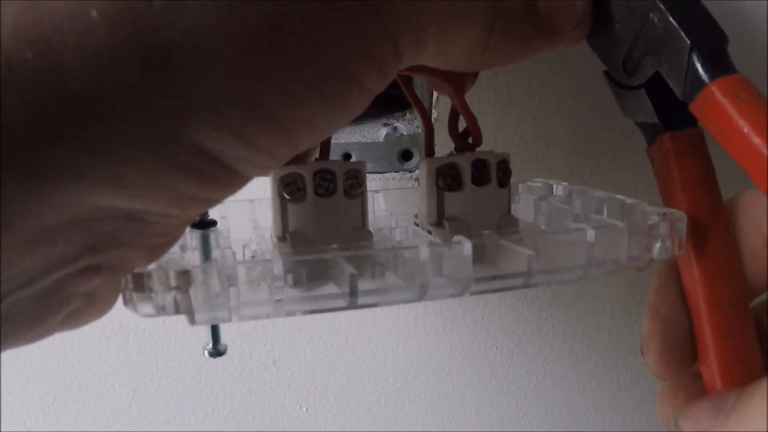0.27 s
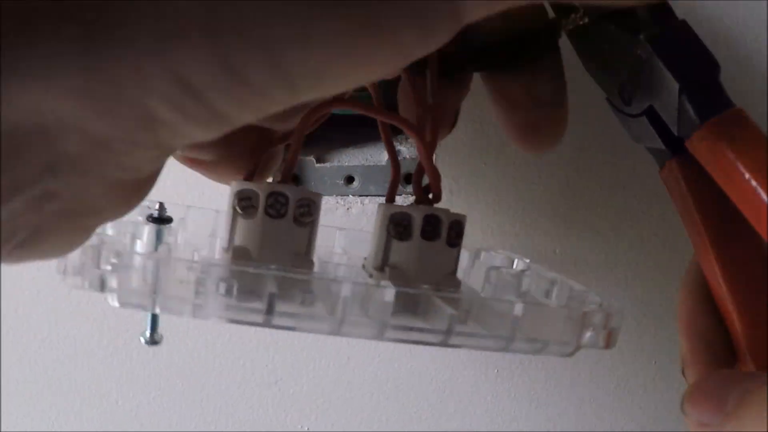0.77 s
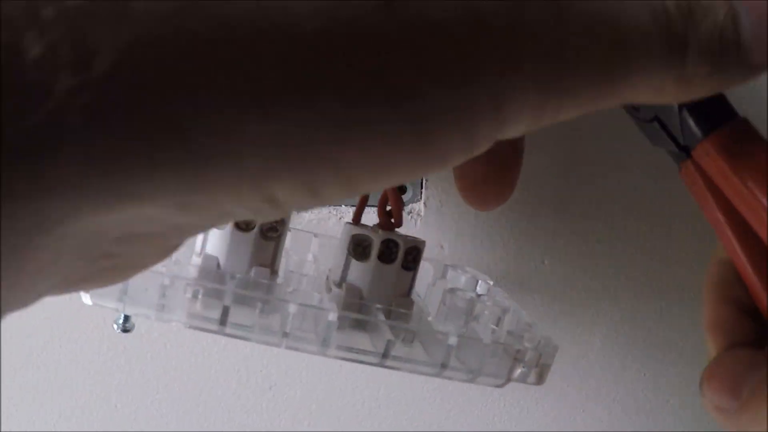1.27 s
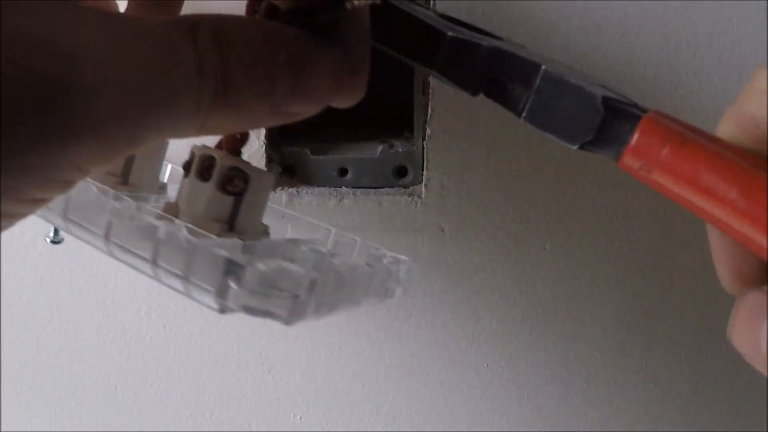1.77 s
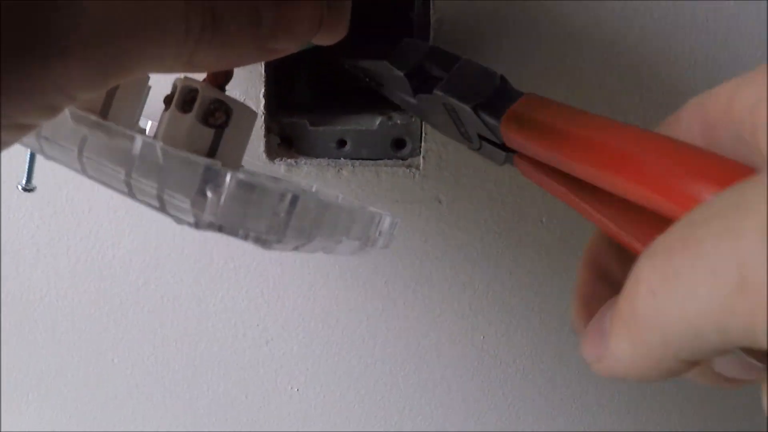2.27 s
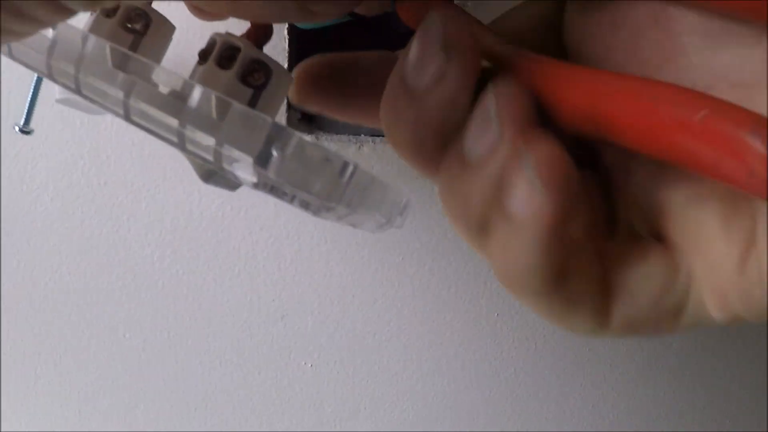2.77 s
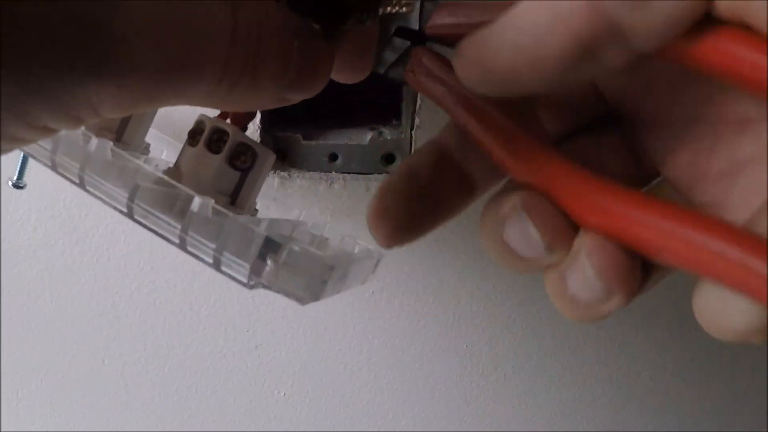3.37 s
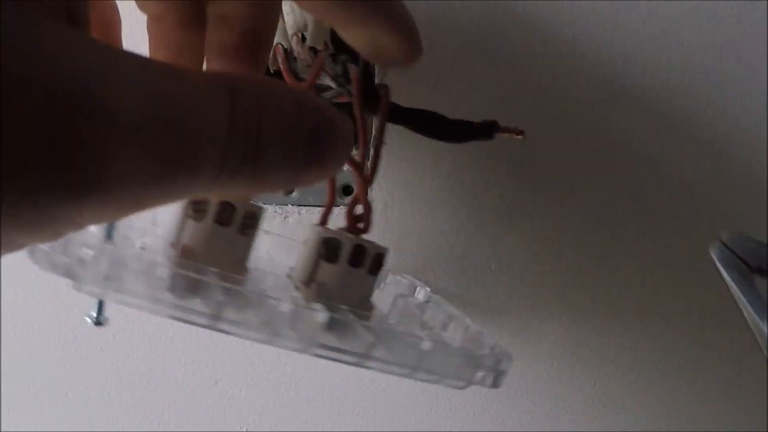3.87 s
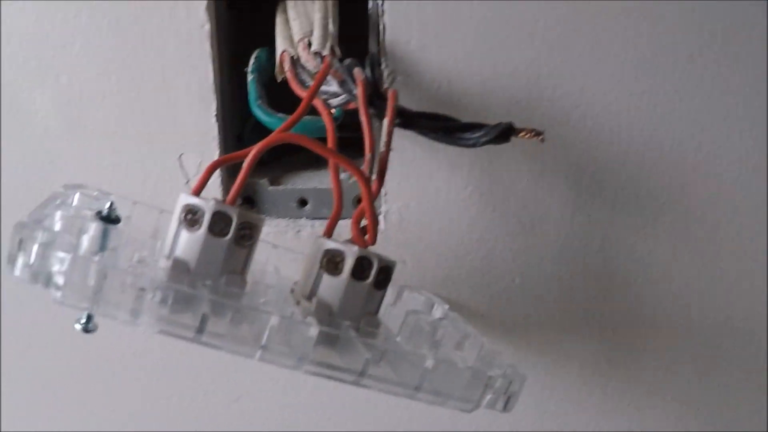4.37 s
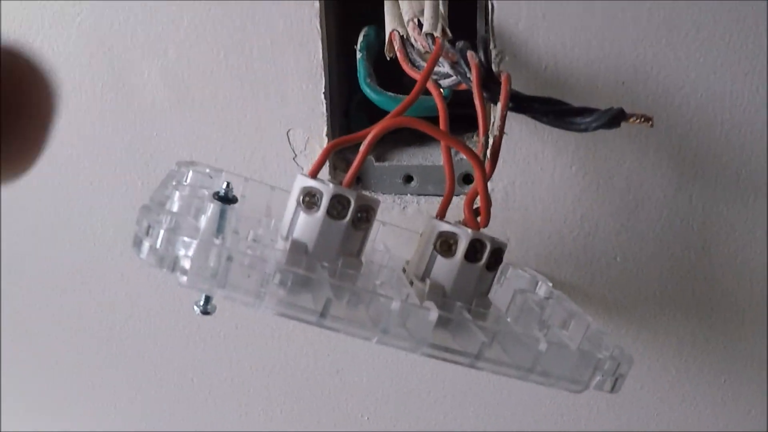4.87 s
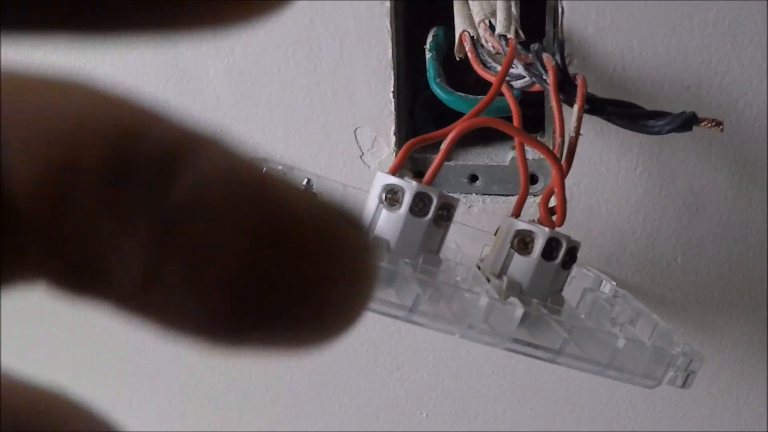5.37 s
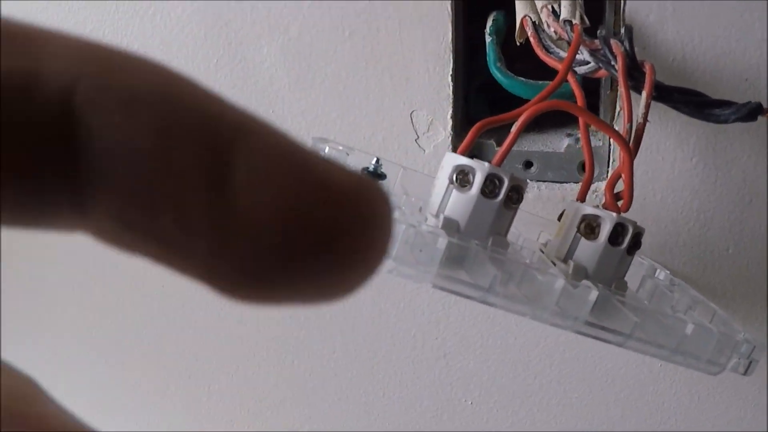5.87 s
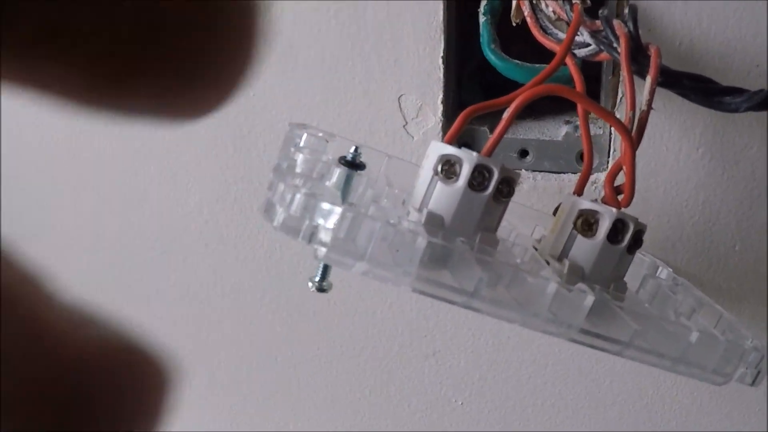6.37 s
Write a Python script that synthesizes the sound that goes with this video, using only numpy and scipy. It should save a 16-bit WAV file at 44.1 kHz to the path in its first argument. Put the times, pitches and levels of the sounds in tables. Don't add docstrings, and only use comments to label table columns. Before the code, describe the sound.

Bright metallic clicks and small scrapes from pliers on copper wire, followed by low handling bumps and two hard, overloading knocks close up.

```python
import sys
import numpy as np
from scipy import signal
from scipy.fft import rfft, irfft
from scipy.io import wavfile

SR = 44100
rng = np.random.default_rng(int(sys.argv[2]) if len(sys.argv) > 2 else 0)


def store_pcm(level_fs):
    pcm = np.round(np.clip(level_fs, -1, 1) * 32767).astype(np.int16)
    wavfile.write(sys.argv[1], SR, np.atleast_2d(pcm).T)


def volts(x):
    e = np.asarray(x, float) / 20
    return 10 ** e


N = 292824
T = np.arange(N) / SR

# (f/Hz, level/dB, t60/s)
JAW_MODES = [(1516, -0.5, 0.014), (1681, 9.5, 0.0064), (2343, 1, 0.012), (2950, -2, 0.0018),
             (3710, 4, 0.017), (4000, 9, 0.0025), (4780, -4, 0.0031), (5370, 9.5, 0.0039),
             (5900, -1.5, 0.037), (6130, 7.5, 0.011), (7060, 3, 0.014), (9110, -6.5, 0.0099),
             (10043, -29, 0.016), (12500, -22, .003)]
# (t/s, peak level/dB, ring f/Hz, dull part level/dB, slip/ms)
BITES = [(0.9068, -25.5, 4820, -22.5, 3.2), (1.0524, -31, 4660, -28, 3), (1.0724, -11.5, 4430, -17, 1.7),
         (1.078, -3, 4160, -19.5, 0.8), (1.0783, -24, 9700, -34.5, 2.5), (1.0781, -8.5, 5960, -33.5, 3.9),
         (1.083, -22.5, 5970, -8, 2.5), (2.6384, -6.5, 3290, 1, 1.1), (2.644, -19, 2950, 2, 12),
         (2.65, -10.5, 2950, -5, 1.7), (2.6507, -16.5, 6100, -29, 2.4), (2.6405, -17, 5640, -25, 3),
         (2.6574, -19.5, 2901, -11, 1.5), (2.7586, -31, 3420, -6, 3.9), (3.2086, -31.5, 4280, -15.5, 3),
         (3.2609, -21, 3830, -8, 1.7), (3.2614, -25, 6500, -20, 3), (3.3901, -13, 5410, -16, 3.3),
         (3.391, -20, 4600, -12.5, 2), (3.3915, -7.5, 3610, -19, 1.9), (3.3958, -23, 5240, -5, 2.3),
         (3.397, -19, 5300, -10, 3.6), (3.3994, -13, 5470, -14, 1.5), (3.3992, -31.5, 8840, -29.5, 1.3),
         (3.4018, -28, 5270, -31, 3), (3.645, -29.5, 3192, 7.5, 3.4), (3.7274, -19, 3140, -29, 4.6),
         (3.7267, -17.5, 5740, -26.5, 4), (3.7284, -17.5, 3300, -29, 2.8), (3.7295, -9, 3180, -21.5, 2),
         (3.7323, -15.5, 3070, -31, 1.9), (3.7358, -21.5, 7160, -32, 4.1), (3.7368, -13, 5760, -23.5, 0.8),
         (3.742, -28, 5500, -28.5, 8.8), (3.8172, -34.5, 4381, -13, 8.5), (4.001, -31, 4130, -10, 6.1),
         (4.0234, -26.5, 4445, -4, 2.7)]
# (t/s, peak level/dB, ring f/Hz, dull part level/dB)
TICKS = [(0.7176, -41, 3240, -10), (0.718, -45, 1540, -28), (1.37, -39, 2240, -20), (2.381, -34, 1360, -26),
         (0.8598, -46, 6544, -1), (3.4125, -36, 5300, -20), (.918, -38.5, 3034, 0), (.946, -45, 4000, 2),
         (1.13, -47, 4000, 2), (2.249, -51, 2900, 14), (0.98, -39, 3700, 1), (1.112, -31, 6000, -20),
         (1.119, -36, 5760, -26), (1.2385, -32.5, 4640, -12), (1.261, -38.5, 3770, -11),
         (1.369, -37.5, 3040, -13), (1.795, -53, 6450, -6), (1.832, -42.5, 6250, -8),
         (1.911, -41.5, 6000, -19), (2.386, -35, 4450, 3), (2.6027, -38.5, 3730, 5),
         (2.704, -38, 3050, -11), (2.9732, -35.5, 3680, -8), (3.0111, -41, 7570, -3),
         (3.0218, -43, 4660, 0), (3.0325, -37.5, 3250, 5), (3.05, -40, 3380, -2), (3.144, -41.5, 2911, -8),
         (3.2215, -33.5, 2700, -20), (3.305, -38.5, 6710, 4), (3.4052, -25.5, 5300, -26),
         (3.611, -41, 3108, 11.5), (3.666, -47, 4620, -1.5), (4.0291, -31, 4600, -6),
         (4.175, -36.5, 4600, -4), (4.4744, -37, 2884, -5)]


def jaws():
    tick_slip_ms, build_ms = 7.3, 0.23
    unlike = 0.61
    split_hz = 4450
    spread_db, lag = 3, 5
    out, t = np.zeros((2, N)), np.arange(1800) / SR
    contacts = BITES + [(*tick, tick_slip_ms) for tick in TICKS]
    for s, peak_db, hz, dull_db, slip_ms in contacts:
        second_hz = hz * (1.39 if hz < split_hz else 0.73)
        envelope = np.exp(-t * 1800 / max(slip_ms, .2)) * np.tanh(t * 1000 / build_ms)
        sparse = rng.random((2, len(t))) < .3
        both, apart = rng.standard_normal((2, len(t))) * sparse * envelope
        both[6] = 2.5
        hits = both + unlike * apart * [[1], [-1]]
        late = np.array([np.roll(both, lag), np.roll(both, rng.integers(0, 2 * lag + 1))])
        common, per_port = rng.standard_normal((len(JAW_MODES), 1)), rng.standard_normal((len(JAW_MODES), 2))
        spread = spread_db * (common + .6 * per_port)

        sound = volts(12.0) * bloom(hits, hz, 0.0054) + volts(5.5) * ring(hits, hz, 0.013)
        sound = sound + volts(np.array([[5.0], [2.5]])) * ring(hits, second_hz, 0.0032)
        for (mode_hz, db, t60), uneven_db in zip(JAW_MODES, spread):
            if mode_hz > 2700:
                octaves_off = min(abs(np.log2(mode_hz / hz)), abs(np.log2(mode_hz / second_hz)))
                near_db, mode = -36.0 * octaves_off, ring(hits, mode_hz, t60)
            else:
                near_db, mode = dull_db + 6.5, bloom(late, mode_hz, t60)
            shade_db = (mode_hz > 8000) * np.array([[-4.0], [3.0]])
            sound = sound + volts(db + near_db + shade_db + uneven_db[:, None]) * mode
        sound = band(sound, 1280, max(9300, 2.53 * hz))
        sound = band(sound, 1400, 20000)
        sound[0] = np.roll(sound[0], 1)
        add(out, s, volts(peak_db) * pan(db=0.5) * sound / np.abs(sound.mean(axis=0)).max())
    return out


# (peak t/s, peak level/dB, build-up/s per 20 dB, dying/s per 20 dB, brightest f/Hz)
CREEP = [(.88, -54, 0.074, 0.07, 6430), (.909, -45.5, 0.015, 0.043, 4400), (1.055, -44, 0.011, 0.041, 4300),
         (1.09, -40, .004, 0.02447, 5900), (1.114, -43, 0.029, 0.075, 5720),
         (1.238, -51, 0.011, 0.11, 4670), (1.82, -55, 0.3056, 0.18, 6355), (1.91, -50, 0.0152, 0.068, 4930),
         (2.384, -43.5, 0.0096, 0.00931, 3820), (2.976, -50, 0.00984, 0.034, 4160),
         (3.02, -50.5, 0.088, 0.087, 4600), (3.212, -30.5, 0.00665, 0.027, 4830),
         (3.258, -47.5, 0.011, 0.057, 5000), (3.384, -53, 0.1168, 0.004, 3070),
         (3.644, -52, 0.031, 0.04, 4042), (4.022, -45.5, 0.046, 0.076, 4100),
         (4.18, -58, 0.03775, 0.02903, 3280), (4.224, -57, 0.1688, 0.16, 3000)]


def creep():
    sizes = volts(2 * np.minimum(rng.exponential(1, N), 4))
    grit = sizes * rng.choice([-1, 1], N) * (rng.random(N) < 2500 / SR)
    steel = sum(volts(db) * ring(grit, hz, t60) for hz, db, t60 in JAW_MODES)
    broad = rms_one(band(steel, 2500, 10000))
    out = np.zeros(N)
    for *shape, hz in CREEP:
        out += swells([shape]) * (0.39 * broad + 0.47 * rms_one(ring(grit, hz, 0.0081)))
    return volts(-0.5) * out


# (f/Hz, level/dB)
PORT_LEFT = [(1500, 4), (2300, -1), (3100, -7.5), (4000, 0.5), (5500, 1.5), (7500, 3), (10000, -14.5),
             (14000, -2.5)]
# (f/Hz, level/dB)
PORT_RIGHT = [(1500, -2), (2300, -7), (3100, -1), (4000, 1), (5500, -4.5), (7500, 3.5), (10000, 6.5),
              (14000, 0.5)]


def ports(x):
    hz = np.maximum(np.fft.rfftfreq(N, 1 / SR), 1)
    return irfft(rfft(x) * volts([at_hz(PORT_LEFT, hz), at_hz(PORT_RIGHT, hz)]), N)


def room(x):
    t60_s, level_db = 0.35, -12.5
    t = np.arange(SR // 4) / SR
    scattered = band(np.abs(x) * rng.standard_normal(N), 700, 6500) + .25 * band(x, 700, 7000)
    tail = rng.standard_normal((2, len(t))) * volts(-60 * t / t60_s) * (t > .004)
    tail = tail / np.sqrt((tail ** 2).sum() / 2)
    return volts(level_db) * signal.fftconvolve(scattered[None], tail)[:, :N]


# (t/s, crack level/dB, strain level/dB, rebound f/Hz, edge level/dB)
SNAPS = [
    (4.6863, 5.497, -5.5, 140, 3.5),
    (6.0421, 7, -4.5, 63.3, 6.5),
]


def snaps():
    strain_hz, rebound_s = 150, .0032
    dome_hz, dome_t60_s, dome_db = 4090, 0.0025, -30.5
    out, t = np.zeros((2, N)), np.arange(-4000, 4000) / SR
    before, after, late = np.minimum(t, 0), np.maximum(t, 0), np.maximum(t - .0017, 0)
    for s, crack_db, strain_db, rebound_hz, edge_db in SNAPS:
        release = (1 - np.tanh((t + 0.00022) / 0.00017)) / 2
        strain = np.exp(before / 0.0074) * np.cos(2 * np.pi * strain_hz * (t + 0.0024)) * release
        crack = np.cos(2 * np.pi * 1600 * t) + 0.086 * np.cos(2 * np.pi * 2250 * t)
        crack = crack * np.exp(-(before / 0.00013) ** 2 - after / 0.00016)
        collapse = -0.7 * np.exp(-((t - .0009) / 0.00049) ** 2)
        phase = 2 * np.pi * rebound_hz * late + 0.68 * (1 - np.exp(-late / 0.001))
        rebound = 1.17 * np.exp(-late / rebound_s) * np.sin(phase)
        burst = 0.28 * volts(edge_db) * crack + 0.63 * collapse + 0.51 * rebound
        blow = volts(strain_db) * strain + volts(crack_db) * burst
        blow = band(band(blow, 8, 3800), 8, 4500)
        blows = np.array([band(np.roll(blow, -6), 4.8, 4500), blow]) * pan(db=-3.5)
        spark = volts(-18.5) * band(t == 0, 4700, 10200) * [[.15], [3.0]]
        dome = ring(ring(t == 0, dome_hz, dome_t60_s), dome_hz, dome_t60_s) / 8
        add(out, s + t[0], blows + spark + volts(dome_db + 2 * edge_db) * dome)
    return out


# (t/s, level/dB, spring-back f/Hz, contact/ms, tick level/dB)
PUSHES = [
    (1.074, -52, 33, 4.4, -47),
    (4.7982, -18.5, 29, 3.9, -35.5),
    (5.048, -31.5, 30, 4.9, -61),
    (5.663, -13.5, 27, 7.3, -29),
    (5.744, -27.5, 34, 11.7, -53),
    (6.031, -49, 69, 5.4, -32.5),
    (6.181, -16, 6.2, 16, -40),
]


def pushes():
    out, t = np.zeros((2, N)), np.arange(6000) / SR
    for s, db, hz, contact_ms, tick_db in PUSHES:
        force = np.sin(np.pi * np.minimum(t * 1000 / contact_ms, 1)) ** 2
        w = 2 * np.pi * hz
        swell = signal.lfilter(*signal.bilinear([1, 0, 0], [1, 1.3 * w, w * w], SR), force)
        tick = band(rng.standard_normal(len(t)) * np.exp(-t / 0.0027), 480, 1330)
        sound = volts(db) * swell / np.abs(swell).max() + volts(tick_db) * tick / np.abs(tick).max()
        add(out, s, sound * pan(db=-4.5))
    return out


# (start t/s, end t/s, starting level/dB, growth/dB, low part level/dB)
RUBS = [(1.87, 1.92, -56.5, -17, 14.5), (2.638, 2.742, -33.5, -22, -1.5), (3.723, 3.741, -56.5, -7.5, 17.5),
        (4.023, 4.094, -39, -24.5, 7), (4.579, 4.692, -41, 12.5, 9.5), (4.802, 4.845, -51.5, 8.5, 6),
        (4.834, 4.858, -38.5, -5, 6), (5.692, 5.747, -36, -4.5, 7), (6.157, 6.194, -54, -1, 10.5),
        (6.187, 6.258, -55.5, 16.5, -8), (6.248, 6.291, -40, -12.5, 1), (6.54, 6.654, -53, -7, -8)]
# (f/Hz, width/Hz, level/dB)
RUB_HIGH = [(1250, 300, 15), (1620, 240, 10), (1960, 200, 12), (4150, 200, -20)]
# (f/Hz, width/Hz, level/dB)
RUB_LOW = [(284, 55, -4), (550, 127, -5)]


def rubs():
    edge_s = 0.0082
    high, low = np.zeros((2, N))
    for start, end, db, growth_db, low_db in RUBS:
        edge = np.clip(np.minimum(T - start, end - T) / edge_s, 0, 1)
        stroke = edge * volts(db + growth_db * np.clip((T - start) / (end - start), 0, 1))
        high, low = high + stroke, low + stroke * volts(low_db)
    grain = pair(alike=0.8)
    high = high * resonant(grain * np.abs(grain), RUB_HIGH) * pan(db=0.0)
    low = low * resonant(pair(alike=0.43), RUB_LOW) * pan(db=-8.5)
    return volts(3.0) * through_case(high + low)


# (f/Hz, phase/rad)
CASE_PHASE = [(300, 3.02), (700, 2.44), (1400, 2.26), (2800, 1.5), (5000, 0.3)]


def through_case(x):
    turn = np.exp(1j * at_hz(CASE_PHASE, np.maximum(np.fft.rfftfreq(N, 1 / SR), 1)))
    return np.array([irfft(rfft(x[0]) * turn, N), x[1]])


# (t/s, level/dB, f/Hz, t60/s)
TUGS = [
    (2.6552, -10.5, 204.5, 0.15),
    (1.075, -32.5, 520, 0.026),
    (1.874, -35.5, 443, 0.045),
    (2.661, -24.5, 112, 0.35),
    (3.592, -29.5, 150, 0.068),
    (3.645, -38, 513, 0.036),
    (3.647, -40, 1080, 0.044),
]


def tugs():
    out, t = np.zeros((2, N)), np.arange(9000) / SR
    for s, db, hz, t60 in TUGS:
        envelope = volts(db - 60 * t / t60) * np.tanh(t / 0.00087)
        add(out, s, envelope * np.sin(2 * np.pi * hz * t) * pan(db=-1.5))
    return out


# (peak t/s, peak level/dB, build-up/s per 20 dB, dying/s per 20 dB)
HUM = [(1.9, -41.5, 0.037, 0.063), (1.085, -39, 0.0091, 0.086), (2.7, -25.5, 0.092, 0.16),
       (2.83, -50, 0.15, 0.051), (3.176, -32, 0.0066, 0.031), (3.23, -35.5, 0.011, 0.22),
       (3.404, -34.5, 0.023, 0.045), (4.045, -34, 0.019, 0.081), (4.17, -47.5, 0.42, 0.13),
       (4.59, -33.5, 0.0042, 0.1), (4.64, -24, 0.05, 0.051), (4.673, -11, 0.012, 0.022946),
       (4.815, -34, 0.0058, 0.037), (5.705, -31, 0.053, 0.06), (6.212, -45.5, 0.024, 0.043),
       (6.28, -40, 0.22, 0.0077)]
# (f/Hz, width/Hz, level/dB)
HUM_MODES = [(150, 16.3, 3.5), (194.6, 23.7, 4.5), (366, 270, -4.5)]
# (peak t/s, peak level/dB, build-up/s per 20 dB, dying/s per 20 dB)
SWAY = [(2.72, -33.5, .025, 1), (3.01, -52, 0.0859, 0.0627), (3.22, -34, 0.13, 0.35),
        (3.345, -28.5, 0.28, 0.091), (3.45, -36, 0.04725, 0.21), (3.6, -32.5, 0.0532, 0.38),
        (3.91, -43, 0.1, 0.077), (4.0, -45, 0.1519, 0.31), (4.17, -53, 0.38, 0.814), (4.6, -44, 0.63, 0.25),
        (4.71, -23.5, 0.066, 0.13), (4.795, -18, 0.0113, 0.058), (5.058, -36.5, 0.19, 0.32),
        (5.198, -28.5, 0.038, 0.55), (5.444, -28.5, 0.03, 0.2), (5.64, -61, 0.29, 0.099),
        (5.7, -20, 0.067, 0.25), (5.748, -27, 0.15, 0.031), (5.88, -38, 0.29, 0.43),
        (6.065, -18.5, 0.049, 0.11), (6.17, -33, 0.41, 0.14), (6.26, -45, 0.1, 0.068),
        (6.498, -30.5, 0.27, 0.5)]
# (f/Hz, level/dB per Hz)
SWAY_COLOUR = [(8.8, -17), (15, 4.5), (51, 4), (86, -6.5), (125, -4), (160, -49), (280, -120)]


def mount():
    hum = swells(HUM) * resonant(pair(alike=0.98), HUM_MODES)
    sway = swells(SWAY) * shaped(SWAY_COLOUR, [(30, 0.82), (100, 0.73)], [(30, 0.00428), (100, 0.0048)])
    return (hum + volts(-10.5) * sway) * pan(db=-2.5)


def low_cut(x):
    cut_hz, opens_s = 110, 2.675
    shut = np.clip((opens_s - T) / .02, 0, 1)
    return shut * band(band(x, cut_hz, SR), cut_hz, SR) + (1 - shut) * x


def after_rustle():
    gate = sum(np.clip((T - s) / 0.015, 0, 1) * np.exp(-((T - s) / .16) ** 4) for s, *_ in SNAPS)
    return volts(-68) * gate * rms_one(band(pair(alike=-0.36), 900, 4500))


# (f/Hz, level/dB per Hz)
AIR = [(12, -70.5), (20, -29), (107, -33), (154, -5), (204, -3), (293, -10), (388, -11), (446, -10.5),
       (738, -12.5), (873, -14), (1150, -15), (4940, -33), (9670, -30.5), (14300, -45), (16000, -88.5)]
# (f/Hz, correlation)
LIKENESS = [(60, -0.039), (130, 0.013), (290, -0.28), (640, -0.81), (1410, -0.63), (3100, -0.24),
            (6820, 0.37), (15000, -0.4)]
# (f/Hz, level/dB)
LEAN = [(60, 4), (180, -3), (550, -2), (1650, 1), (4970, -2.0), (15000, -6)]


def air():
    return volts(-44.5) * shaped(AIR, LIKENESS, LEAN)


def gain_dip():
    db = np.zeros(N)
    for s, *_ in SNAPS:
        after = np.maximum(T - s, 0)
        fast_db, slow_db = 14 * np.exp(-(after / .1) ** 2), 6 * np.exp(-after / .6)
        db -= (fast_db + slow_db) * np.minimum(after / .004, 1)
    return volts(db)


def ring(x, hz, t60):
    r, w = volts(-60 / (t60 * SR)), 2 * np.pi * hz / SR
    return signal.lfilter([0, np.sin(w)], [1, -2 * r * np.cos(w), r * r], x + 1e-18)


def bloom(x, hz, t60):
    return 2 * np.e * (1 - volts(-60 / (t60 * SR))) * ring(ring(x, hz, t60), hz, t60)


def resonant(x, peaks):
    out = 0
    for k, (hz, width_hz, db) in enumerate(peaks):
        t60 = 1.91 / width_hz / 1.73
        out = out + (-1) ** k * volts(db) * rms_one(ring(ring(x, hz, t60), hz, t60))
    return rms_one(out)


def swells(rows):
    out = np.zeros(N)
    for s, db, rise, fall in rows:
        rise, fall = max(rise, .001), max(fall, .001)
        span = slice(int(max(s - 3 * rise, 0) * SR), int((s + 3 * fall) * SR))
        out[span] += volts(db - 20 * np.maximum((s - T[span]) / rise, (T[span] - s) / fall))
    return out


def blend(mid, side, alike):
    alike = np.clip(alike, -1, 1)
    return np.sqrt(1 + alike) * mid + np.sqrt(1 - alike) * side * [[1], [-1]]


def pair(alike):
    return blend(*rng.standard_normal((2, N)), alike)


def shaped(spectrum, likeness, lean):
    hz = np.maximum(np.fft.rfftfreq(N, 1 / SR), 1)
    both = blend(*rfft(rng.standard_normal((2, N))), at_hz(likeness, hz))
    return rms_one(irfft(both * volts(at_hz(spectrum, hz) + at_hz(lean, hz) * [[.5], [-.5]]), N))


def band(x, low_hz, high_hz):
    edges = [low_hz, min(high_hz, .45 * SR)]
    return signal.sosfilt(signal.butter(2, edges, "band", fs=SR, output="sos"), x)


def at_hz(points, hz):
    f, value = np.array(points).T
    return np.interp(np.log(hz), np.log(f), value)


def rms_one(x):
    return x / np.sqrt(np.mean(x ** 2) + 1e-20)


def pan(db):
    return volts([[db / 2], [-db / 2]])


def add(track, s, sound):
    i = round(s * SR)
    track[..., i:i + sound.shape[-1]] += sound[..., :N - i]


def scene():
    steel = ports(jaws()) + creep() * pan(db=5.5)
    echo = room(steel.mean(axis=0))
    handling = low_cut(rubs() + mount() + tugs()) + pushes() + snaps()
    return steel + echo + handling + air() * gain_dip() + after_rustle()


def band_limit(x):
    return signal.sosfilt(signal.butter(12, 16510, fs=SR, output="sos"), x)


def record(dry):
    rounded = np.tanh(dry ** 3 / 3 + dry)
    mix = signal.sosfilt(signal.cheby2(8, 50, 17000, fs=SR, output="sos"), rounded)
    return band_limit(mix)


dry = scene()
out = record(dry)
store_pcm(out)
```